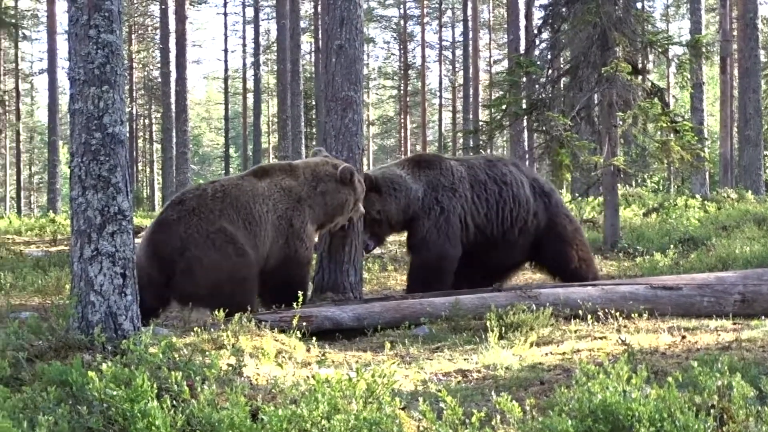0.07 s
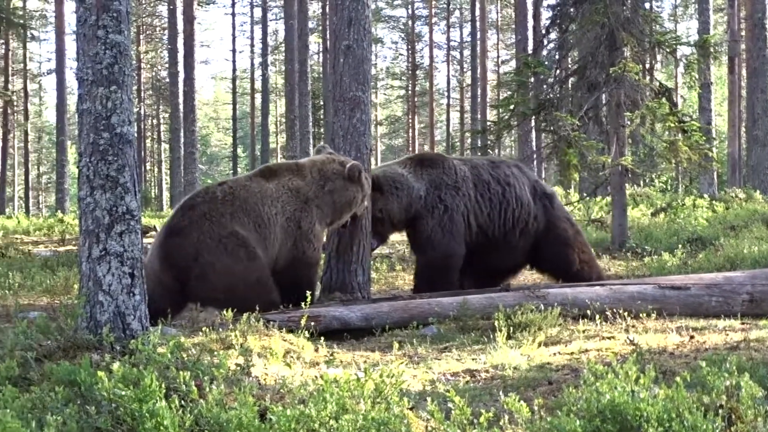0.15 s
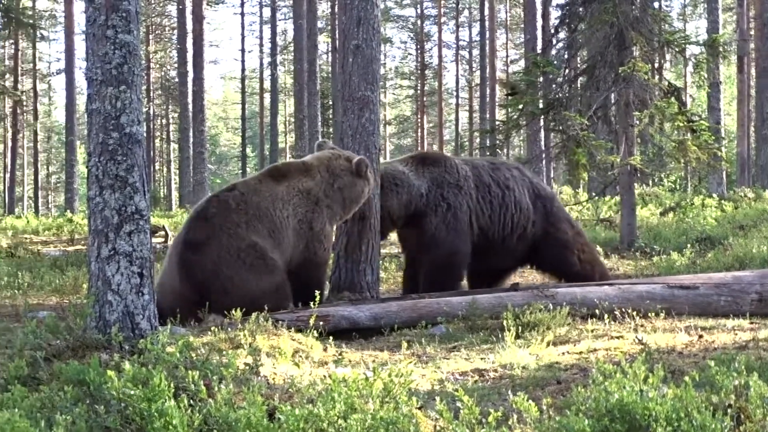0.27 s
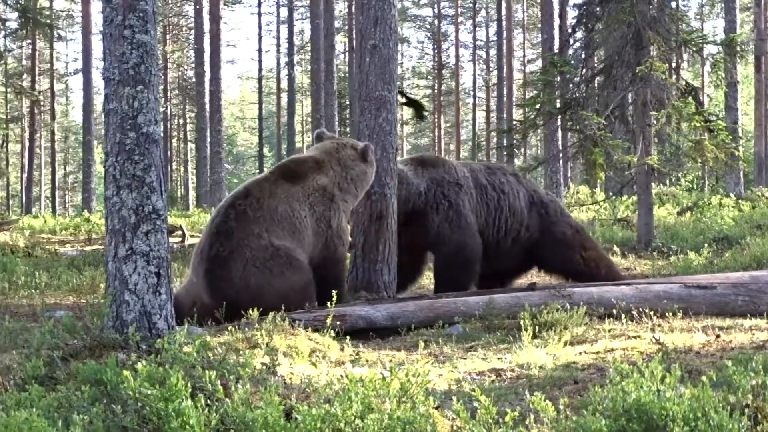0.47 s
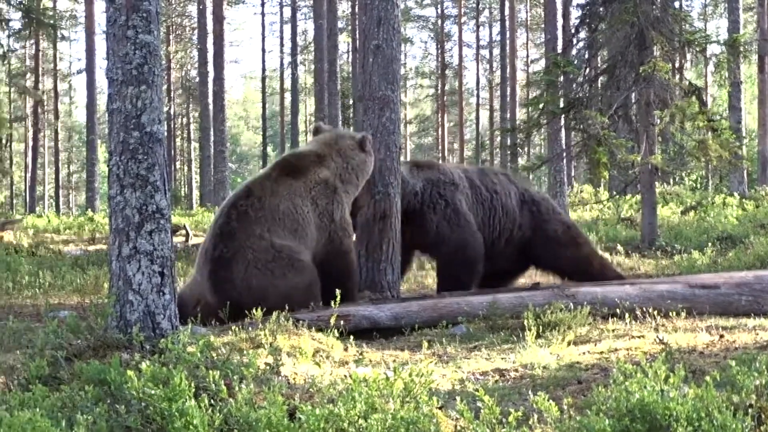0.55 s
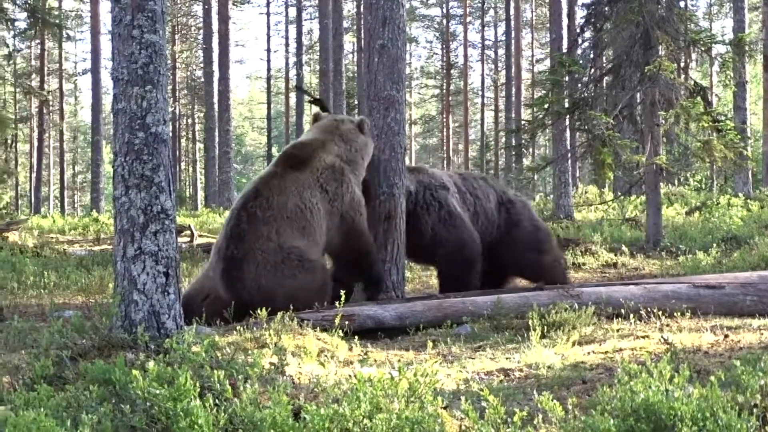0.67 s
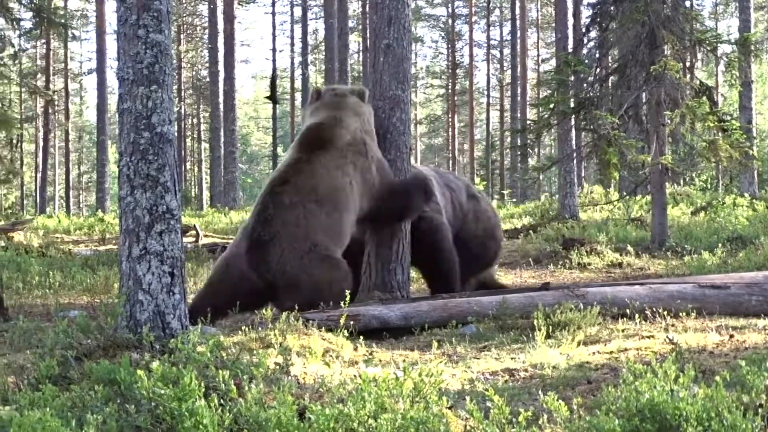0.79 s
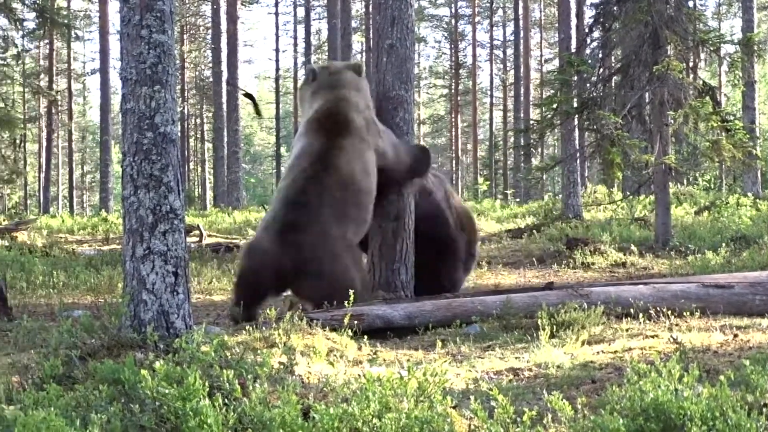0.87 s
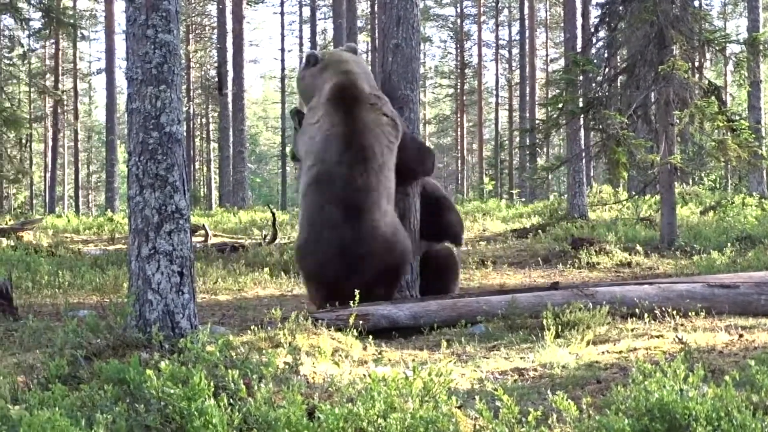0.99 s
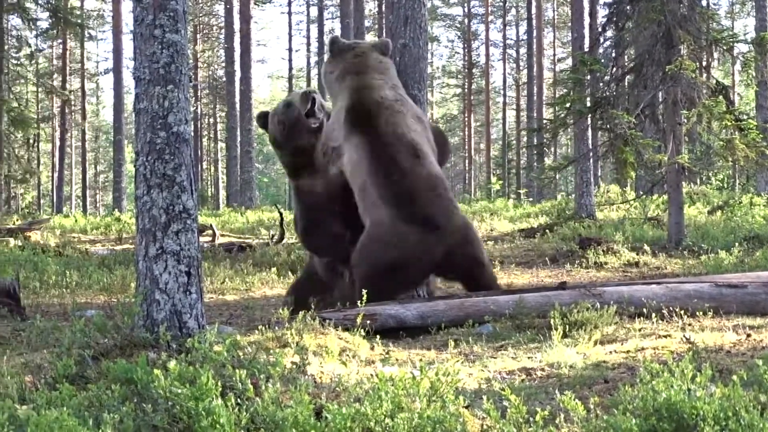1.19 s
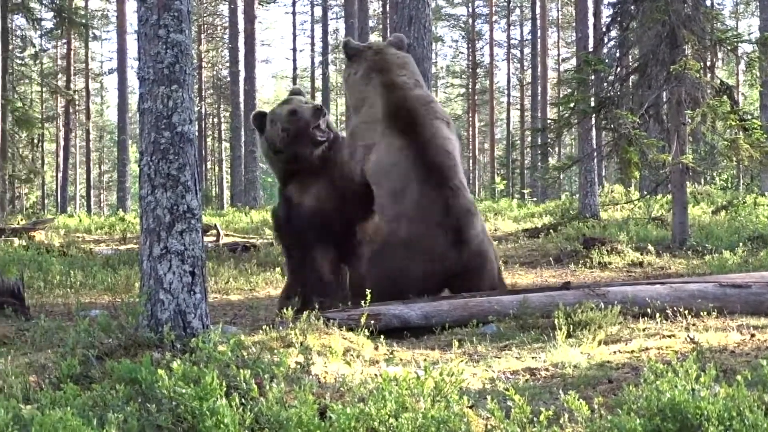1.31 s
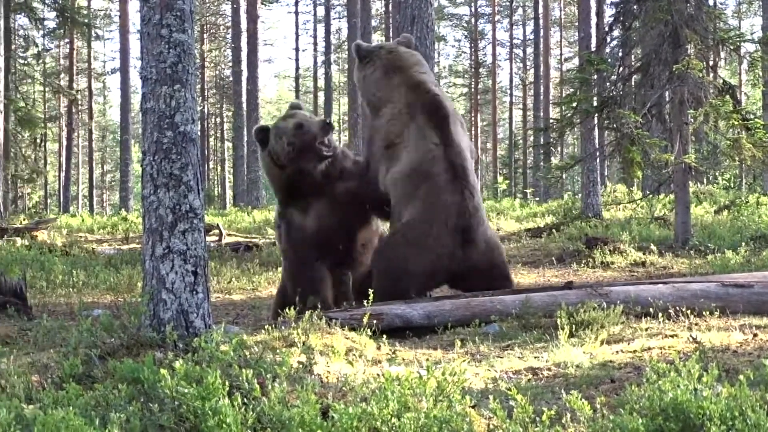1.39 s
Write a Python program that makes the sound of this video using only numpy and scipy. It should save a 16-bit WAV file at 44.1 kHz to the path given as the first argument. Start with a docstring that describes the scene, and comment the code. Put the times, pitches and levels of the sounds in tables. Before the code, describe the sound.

Two bears growl in a forest. One holds a hoarse moan as twigs snap and a paw thuds, then the other swells into a louder, rough roar, ending in short rasps and heavy steps.

```python
"""Two brown bears square up in a pine forest. First one holds a hoarse, fluttering moan: vocal folds
and breath, filtered by the throat. Twigs snap, a thin squeak passes, and at 0.6 s a paw lands with a
thud. The other bear then swells into a louder, rough roar that rises over faint ticks and sinks.
From 1.1 s they grapple with short throaty rasps and heavy steps. Throughout, the trunks return a
dull tail over the soft rush of forest air."""
import sys
import numpy as np
from scipy import signal
from scipy.fft import rfft, irfft, next_fast_len
from scipy.io import wavfile
from scipy.ndimage import uniform_filter1d, minimum_filter1d

SR = 44100
rng = np.random.default_rng(int(sys.argv[2]) if len(sys.argv) > 2 else 0)


def file_out(sig):
    """Save sig as 16-bit WAV at sys.argv[1]."""
    # one column per channel
    cols = np.atleast_2d(sig).T
    # limit, then scale
    lim = np.clip(cols, -1, 1)
    pcm = np.round(lim * 32767).astype(np.int16)
    wavfile.write(sys.argv[1], SR, pcm)


N = 63945
TIME = np.arange(N) / SR

# noise spectra of the air, steps, paw slap and rasps: f/Hz, relative level/dB
AIR_SPECTRUM = [(25, -17.5), (70, -25.5), (160, 0.5), (300, 0), (470, 0.5), (750, -6.5), (1500, -15),
                (2000, -9.5), (3000, -29), (4000, -31), (6000, -43.5), (11000, -40)]
STEP_SPECTRUM = [(25, -31.5), (60, 3), (125, 0.5), (170, 4.5), (230, -26.5), (340, -6), (1500, -62)]
SLAP_SPECTRUM = [(50, -15), (140, 8.5), (300, -10.5), (420, -3.5), (800, -15), (1650, -2.5), (2100, -30.5),
                 (3600, -33), (4500, -46.5), (8000, -65.5)]
GRUNT_SPECTRUM = [(300, -6), (600, -11), (800, -5), (1300, -3.5), (1600, -7.5), (2700, -10.5), (3600, -28),
                  (5500, -40.5), (7000, -64.5)]
# faint dry clicks: t/s, level/dB
TICK_TIMES = [(.222, -33), (.7258, -36), (.7384, -39), (.7792, -33), (.787, -38), (.7988, -36),
              (.8087, -32), (.8144, -35), (.8258, -33), (.8389, -37), (.8934, -32), (.9308, -33),
              (.9886, -39)]
# footfalls on moss: t/s, level/dB, Gaussian width/s
FOOTFALLS = [(.125, -39.5, 0.061), (.59, -39, 0.029), (1.2, -38.5, 0.067), (1.372, -33.5, 0.012),
             (1.435, -31, 0.028)]
# snapping twigs and bark: t/s, level/dB, decay/s, f/Hz
SNAPS = [(.204, -48, 0.0025, 3500), (.401, -29, 0.0026, 2650), (.611, -33, 0.005, 3450)]
# spectrum of a snap: multiple of its f, relative level/dB
SNAP_SPECTRUM = [(.3, -18), (.75, -3), (1, 3), (1.2, -6), (1.4, -21), (3.2, -46)]
# the paw's slap: t/s, level/dB, decay/s
SLAPS = [(.6, -19, 0.011)]
# modes of the struck body: f/Hz, level/dB, decay/s
BODY_MODES = [(146, -20, .022), (287, -22.5, 0.038), (570, -38.5, 0.02), (1130, -23.5, 0.007),
              (1600, -27, 0.02)]
# course of the squeak: t/s, fundamental f/Hz, level/dB
SQUEAK_CURVE = [(.45, 1095, -72), (.475, 1125, -52), (.53, 1175, -50), (.59, 1125, -72)]
# its overtones: harmonic number, relative level/dB
SQUEAK_HARMONICS = [(2, 3), (3, 0), (4, -19)]
# short pushes of air through the throat: t/s, level/dB, Gaussian width/s
GRUNT_PULSES = [(1.141, -26, .006), (1.203, -35, 0.012), (1.226, -30, 0.01), (1.26, -28.5, 0.004),
                (1.289, -30.5, 0.0035), (1.33, -39, .018)]
# throat modes that they excite: f/Hz, relative level/dB
THROAT_MODES = [(770, -1), (835, -5.5), (1130, -23.5), (1290, -2.5)]
# course of the moan: t/s, f/Hz, level/dB, mouth opening (0-1), rasp/dB
MOAN_CURVE = [(0, 159.3, -51, 0.3, -11.5), (.04, 166.8, -33, 0.45, -18.5), (.11, 186.1, -36, 0.3, -15),
              (.15, 206.8, -32.5, 0.4, -6), (.2, 203.9, -33, 0.2, 5), (.36, 214, -27.5, 0.05, 7),
              (.45, 212.3, -25.5, 0.2, 2), (.55, 202.3, -25.5, 0.7, 0.5), (.68, 197, -20.5, 0.58, 2),
              (.78, 195.4, -20.5, 0.6, -2), (.9, 183.4, -22.5, 1, -2.5), (1.05, 182, -29, 0.3, 12),
              (1.15, 175.4, -47.5, 0.7, 14)]
# its vocal tract with the mouth nearly shut, and open: f/Hz, gain/dB
SHUT_TRACT = [(100, -18.5), (200, 1.5), (420, -25.5), (620, -26), (830, -17), (1000, -26.5), (1200, -11),
              (1420, -15.5), (1600, -21), (1800, -53), (2250, -37.5), (2600, -52.5), (3200, -47),
              (4200, -76), (5000, -63.5), (6500, -75.5)]
OPEN_TRACT = [(100, -5.5), (200, -11), (400, -7.5), (600, -2), (810, -22), (1020, -20.5), (1400, -20),
              (1620, -15), (1850, -22), (2400, -33), (3400, -40.5), (4000, -57), (6500, -63.5)]
# its nasal resonance: t/s, f/Hz, gain/dB
NASAL_FORMANT = [(.05, 1560, 3), (.11, 1500, 3.5), (.18, 1470, 10), (.33, 1294, 2.5), (.47, 1290, 4.5),
                 (.62, 1400, -1)]
# a second tone beside the moan: t/s, f/Hz, level/dB
SIDE_TONE = [(.02, 347.5, -58.5), (.06, 350, -42), (.11, 372, -37.5), (.16, 352.7, -54), (.23, 343, -32.5),
             (.31, 364.3, -36), (.38, 359.4, -32.5), (.47, 379, -40.5), (.52, 364, -50.5)]
# course of the roar: t/s, f/Hz, level/dB, mouth formant f/Hz, formant gain/dB, treble gain/dB
ROAR_CURVE = [(.45, 175.1, -34, 803, 2, -9.5), (.52, 169.7, -36, 790, 6.5, -10.5),
              (.655, 156.5, -31, 790, -5.5, -6), (.69, 156.3, -22.5, 770, 12.5, -9.5),
              (.74, 160.7, -19.5, 774, 7.5, -6.5), (.82, 173.8, -21, 773, 31.5, -14),
              (.865, 179.8, -18.5, 744, 10.5, 3.5), (.93, 184.2, -22, 729.5, 14.5, 7),
              (1.0, 176.9, -20.5, 742, 8.5, 3.5), (1.06, 169.6, -21, 717, 23, 1),
              (1.1, 154.7, -24, 773, 15.5, 10.5), (1.127, 141.2, -18, 715, 7, 2),
              (1.16, 128.2, -32, 720, -9.5, 4.5), (1.2, 119.7, -63, 725, 13, 3)]
# its vocal tract: f/Hz, gain/dB
ROAR_TRACT = [(70, -40), (105, -21), (130, 2), (185, 3), (250, -27.5), (320, -3.5), (370, -2.5), (440, -14),
              (540, -14), (880, -13.5), (1060, -20), (1220, -15), (1550, -21.5), (1800, -27), (2100, -26.5),
              (2700, -29.5), (3200, -40), (3700, -58.5), (4400, -62), (5000, -49), (5800, -74)]
# its second mouth resonance: t/s, f/Hz, gain/dB
UPPER_FORMANT = [(.7, 1558, 6.5), (.77, 1480, 14), (.82, 1570, 11), (.86, 1450, -7.5), (.91, 1540, 15.5),
                 (1.0, 1260, 7), (1.135, 1140, 16.5)]
# its hoarseness: t/s, rasp/dB
HOARSENESS = [(.45, -18), (.69, -7), (.77, -12), (.83, -11), (.87, -4), (.96, -6), (1.05, 0), (1.09, -3),
              (1.125, -8), (1.2, -2)]
# left microphone port relative to the right: f/Hz, phase/rad
MIC_PHASE = [(0, 0), (340, -0.25), (1550, -0.31), (3450, -1.44)]
# the same for level: f/Hz, level/dB
MIC_BALANCE = [(440, 0.24), (1680, 2.5), (4500, 1.5), (7000, 0.5)]

AIR_DB, FOREST_DB, FOREST_WIDTH = -44.5, -13, .35
FOREST_T60_S, FOREST_GAP_S, FOREST_DULL_HZ = .68, .016, 3000
JITTER_PER_S, SHIMMER_PER_S, PHASE_SCATTER_RAD = 68.4, 25.5, 1.16
RASP_FULL_HZ, RASP_BASS_DB, RASP_PULSING = 1060, -12.5, .18   # the rasp weakens below RASP_FULL_HZ
MOAN_JITTER, FLUTTER_HZ, FLUTTER_DEPTH = .012, 58.1, .12
NASAL_WIDTH_HZ, MOUTH_WIDTH_HZ, UPPER_WIDTH_HZ = 120, 70.5, 27
ROAR_JITTER, RAGGED_REF_DB, RAGGED_SLOPE = .024, -6.5, .88   # jitter grows with the rasp
FULL_VOICE_DB, TREBLE_FULL_HZ = -30.5, 3200   # below FULL_VOICE_DB the roar's overtones weaken
LIMITER_CEILING, CUTOFF_HZ = .53, 11200


def from_db(db):
    """Amplitude grows tenfold every 20 dB."""
    return 10 ** (np.asarray(db) / 20)


def unit_rms(x):
    """Division by the RMS value gives unit power."""
    return x / np.sqrt(np.mean(x ** 2) + 1e-20)


def in_time(rows):
    """Linear interpolation gives each column at every sample."""
    times, *columns = np.transpose(rows)
    return [np.interp(TIME, times, column) for column in columns]


def at_hz(points, hz):
    """A spectrum is interpolated on a logarithmic frequency axis."""
    freqs, values = np.transpose(points)
    return np.interp(np.log(np.maximum(hz, 1)), np.log(freqs), values)


def bell(hz, centre, width):
    """A Gaussian approximates a resonance peak of unit height."""
    return np.exp(-.5 * ((hz - centre) / width) ** 2)


def phase_of(hz):
    """Phase is the time integral of angular frequency."""
    return 2 * np.pi * np.cumsum(hz) / SR


def lowpass(x, hz):
    """A first-order filter attenuates the treble above its corner."""
    return signal.sosfilt(signal.butter(1, hz, fs=SR, output="sos"), x)


def drift(rate):
    """Two-pole smoothing of noise gives a slow fluctuation of unit RMS."""
    hop, settle = 20, 1000
    pole = np.exp(-2 * np.pi * hop * rate / SR)
    white = rng.standard_normal(N // hop + settle + 2)
    slow = signal.lfilter([1], [1, -2 * pole, pole * pole], white)[settle:]
    return np.interp(np.arange(N) / hop, np.arange(len(slow)), unit_rms(slow))


def noise(spectrum):
    """Spectral weighting turns white noise into coloured noise of unit power."""
    size = next_fast_len(N)
    gain = from_db(at_hz(spectrum, np.arange(size // 2 + 1) * SR / size))
    return unit_rms(irfft(rfft(rng.standard_normal(size)) * gain, size)[:N])


def swells(rows, spectrum):
    """Gaussian envelopes modulate noise into soft bursts."""
    return noise(spectrum) * sum(from_db(db) * bell(TIME, t, width) for t, db, width in rows)


def hits(rows, spectrum):
    """Impact noise rises quickly and decays exponentially."""
    envelope, attack_share = 0, .042
    for t, db, decay in rows:
        age = np.maximum(TIME - t, 0) / decay
        envelope += from_db(db) * (1 - np.exp(-age / attack_share)) ** 2 * np.exp(-age)
    return noise(spectrum) * envelope


def forest_air():
    """Partly correlated noise in the two channels is heard as a wide, soft rush."""
    mid, side = noise(AIR_SPECTRUM), .32 * noise(AIR_SPECTRUM)
    return from_db(AIR_DB) * np.array([mid + side, mid - side])


def trunk_echoes(x):
    """Scattering from the trunks acts as convolution with dull, decaying noise."""
    scatter = rng.standard_normal((2, N)) * from_db(-60 * TIME / FOREST_T60_S) * (TIME > FOREST_GAP_S)
    response = lowpass(scatter / np.sqrt(np.sum(scatter[0] ** 2)), FOREST_DULL_HZ)
    mid, side = signal.fftconvolve(x[None], response, axes=1)[:, :N]
    return from_db(FOREST_DB) * np.array([mid + FOREST_WIDTH * side, mid - FOREST_WIDTH * side])


def ticks():
    """An impulse without resonance is heard as a faint dry click."""
    impulses = np.zeros(N)
    for t, db in TICK_TIMES:
        impulses[int(t * SR)] = from_db(db)
    return lowpass(impulses + 1e-18, hz=6000)


def steps():
    """Soft contact with moss confines a heavy step to low frequencies."""
    return swells(FOOTFALLS, STEP_SPECTRUM)


def twigs():
    """Fracture releases a burst of noise around the natural frequency of each piece of wood."""
    return sum(hits([(t, db, decay)], [(ratio * hz, level) for ratio, level in SNAP_SPECTRUM])
               for t, db, decay, hz in SNAPS)


def paw():
    """A padded slap excites the damped modes of the body it lands on."""
    age = np.maximum(TIME - SLAPS[0][0], 0)
    ring = sum((-1) ** k * from_db(db) * np.sin(2 * np.pi * hz * age) * np.exp(-age / decay)
               for k, (hz, db, decay) in enumerate(BODY_MODES))
    attack = (1 - np.exp(-age / .00041)) ** 2
    return ring * attack + hits(SLAPS, SLAP_SPECTRUM)


def squeak():
    """Harmonics of a missing fundamental form a faint, unsteady whistle."""
    hz, db = in_time(SQUEAK_CURVE)
    jitter, shimmer_db = .004, 2
    phase = phase_of(hz * (1 + jitter * drift(2 * JITTER_PER_S)))
    sounding = (TIME > SQUEAK_CURVE[0][0]) & (TIME < SQUEAK_CURVE[-1][0])
    return sounding * sum(from_db(db + level + shimmer_db * drift(JITTER_PER_S)) * np.sin(k * phase)
                          for k, level in SQUEAK_HARMONICS)


def grunts():
    """Each short push of air drives the throat's resonances under a rasp."""
    sound = from_db(-4.5) * swells(GRUNT_PULSES, GRUNT_SPECTRUM)
    for t, db, width in GRUNT_PULSES:
        ring = sum(from_db(level) * np.cos(2 * np.pi * hz * rng.normal(1, .023) * (TIME - t))
                   for hz, level in THROAT_MODES)
        sound += from_db(db) * ring * bell(TIME, t, width)
    return sound


def voice(pitch, jitter, tract, rasp_db, shimmer_db):
    """Source-filter model: the tract's gain in dB shapes vocal-fold harmonics and pulsing breath."""
    phase = phase_of(pitch * (1 + jitter * drift(JITTER_PER_S)))
    folds, breath = 0, 0
    for k in range(1, 25):
        waver_db = shimmer_db * min(k / 3, 1) * drift(SHIMMER_PER_S)
        gain = from_db(tract(k * pitch, formant_share=.91) + waver_db)
        folds += np.sqrt(2) * gain * np.sin(k * phase + rng.normal(0, PHASE_SCATTER_RAD))
    edges_hz = np.geomspace(90, 7000, 31)
    white = rng.standard_normal((2, N))
    for k, (low, high) in enumerate(zip(edges_hz, edges_hz[1:])):
        bandpass = signal.butter(3, [low, high], "band", fs=SR, output="sos")
        band = unit_rms(signal.sosfilt(bandpass, white[k % 2]))
        hz = np.sqrt(low * high)
        gain = from_db(tract(hz, formant_share=1) + RASP_BASS_DB * max(1 - hz / RASP_FULL_HZ, 0))
        breath += band * np.sqrt((high - low) / pitch) * gain   # power scaled per harmonic spacing
    return folds + from_db(rasp_db) * breath * (1 + RASP_PULSING * np.cos(phase))


def moan():
    """Amplitude modulation flutters a hoarse note until the mouth opens; a second tone joins early on."""
    pitch, db, opening, rasp_db = in_time(MOAN_CURVE)
    nasal_hz, nasal_db = in_time(NASAL_FORMANT)
    tone_hz, tone_db = in_time(SIDE_TONE)

    def tract(hz, formant_share):
        """The response blends from shut to open, with a nasal resonance added."""
        mouth = (1 - opening) * at_hz(SHUT_TRACT, hz) + opening * at_hz(OPEN_TRACT, hz)
        return mouth + formant_share * nasal_db * bell(hz, nasal_hz, NASAL_WIDTH_HZ)
    note = voice(pitch, MOAN_JITTER, tract, rasp_db, shimmer_db=1.5)
    flutter_phase = phase_of(FLUTTER_HZ * (1 + .066 * drift(8.3)))
    flutter = 1 + FLUTTER_DEPTH * (1 - opening) * np.sin(flutter_phase)
    tone = np.sqrt(2) * np.sin(phase_of(tone_hz * (1 + MOAN_JITTER * drift(JITTER_PER_S))))
    return from_db(db) * note * flutter + from_db(tone_db) * tone * (TIME < SIDE_TONE[-1][0])


def roar():
    """Irregular vocal-fold vibration roughens an arching call, most of all as its pitch falls."""
    pitch, db, mouth_hz, mouth_db, treble_db = in_time(ROAR_CURVE)
    upper_hz, upper_db = in_time(UPPER_FORMANT)
    rasp_db, = in_time(HOARSENESS)

    def tract(hz, formant_share):
        """Two moving formants and a treble shelf modify a fixed response; a soft voice is duller."""
        lower = mouth_db * bell(hz, mouth_hz, MOUTH_WIDTH_HZ)
        upper = upper_db * bell(hz, upper_hz, UPPER_WIDTH_HZ)
        dulling = np.minimum(db - FULL_VOICE_DB, 0) * np.clip(hz / pitch - 1, 0, 1)
        shelf = treble_db * np.clip(2 * hz / TREBLE_FULL_HZ - 1, 0, 1)
        return at_hz(ROAR_TRACT, hz) + dulling + formant_share * (lower + upper) + shelf
    onset = np.clip((TIME - ROAR_CURVE[0][0]) / .02, 0, 1)
    jitter = ROAR_JITTER * from_db(RAGGED_SLOPE * (rasp_db - RAGGED_REF_DB))
    return from_db(db) * onset * voice(pitch, jitter, tract, rasp_db, shimmer_db=4.2)


def scene():
    """Direct sound, forest air and reverberation add by superposition."""
    calls = moan() + roar() + squeak() + grunts()
    thuds_snaps_and_clicks = paw() + twigs() + ticks() + steps()
    direct = calls + thuds_snaps_and_clicks
    return direct + forest_air() + trunk_echoes(direct)


def record(dry):
    """Close microphone ports differ in phase and level; a limiter holds peaks and the top is cut."""
    padded = np.pad(dry, ((0, 0), (N // 2, N - N // 2)), "reflect", reflect_type="odd")
    hz = np.arange(N + 1) * SR / (2 * N)
    left_port = from_db(at_hz(MIC_BALANCE, hz) / 2) * np.exp(.5j * at_hz(MIC_PHASE, hz))
    picked_up = irfft(rfft(padded) * np.array([left_port, 1 / left_port]))[:, N // 2:N // 2 + N]
    safe_gain = np.minimum(1, LIMITER_CEILING / (np.abs(picked_up).max(axis=0) + 1e-9))
    smooth_gain = uniform_filter1d(minimum_filter1d(safe_gain, size=201), size=201)
    top_cut = signal.cheby2(12, 70, CUTOFF_HZ * 1.08, fs=SR, output="sos")
    fade_out = np.minimum(1, (TIME[-1] - TIME) / .003)
    return signal.sosfilt(top_cut, picked_up * smooth_gain) * fade_out


dry = scene()
out = record(dry)
file_out(out)
```